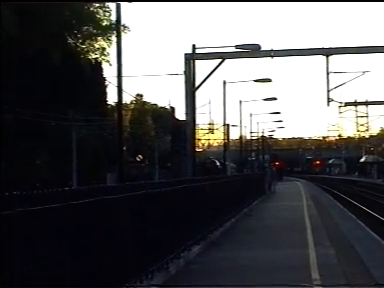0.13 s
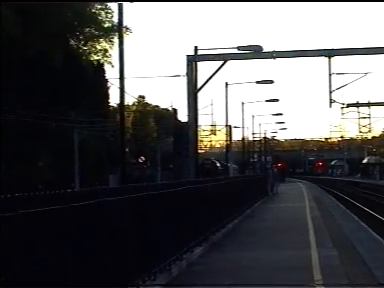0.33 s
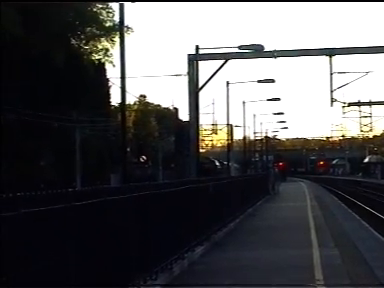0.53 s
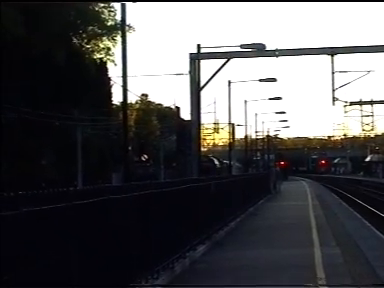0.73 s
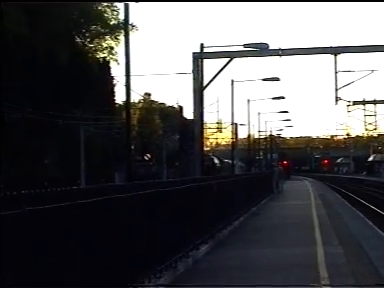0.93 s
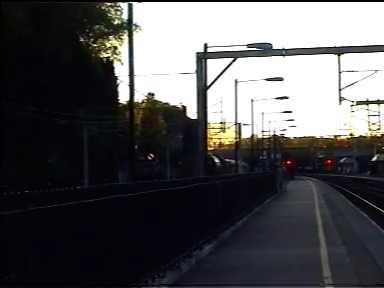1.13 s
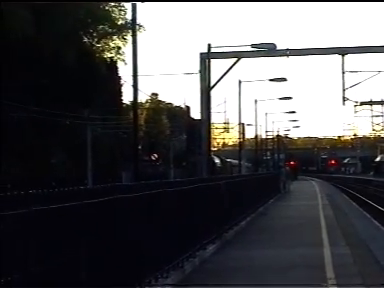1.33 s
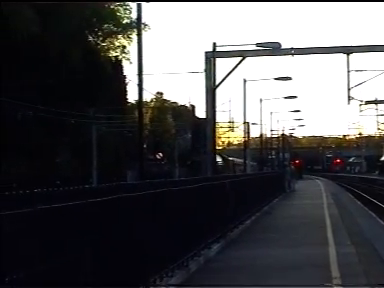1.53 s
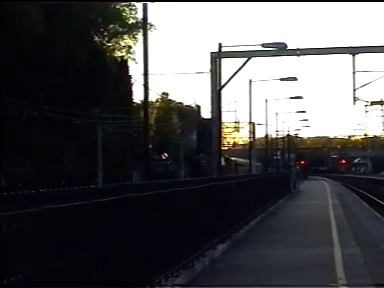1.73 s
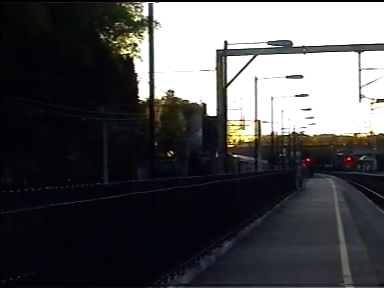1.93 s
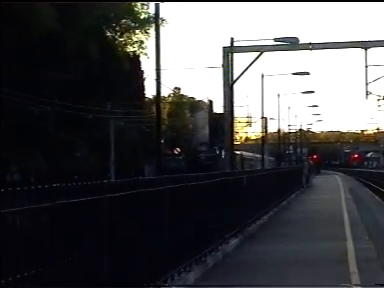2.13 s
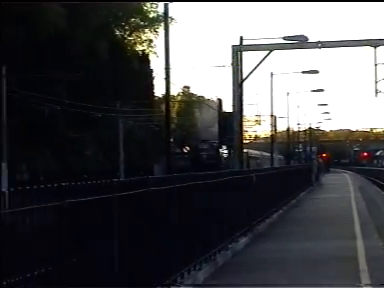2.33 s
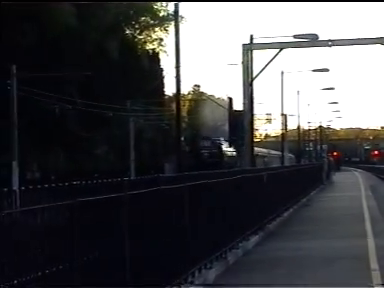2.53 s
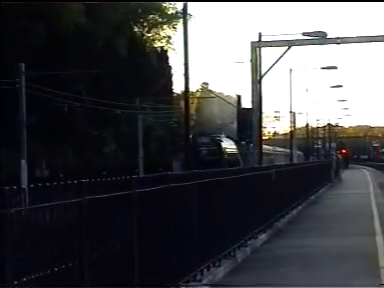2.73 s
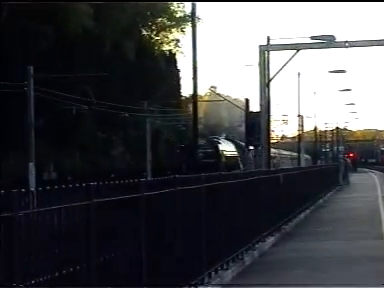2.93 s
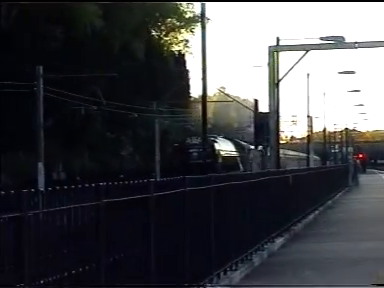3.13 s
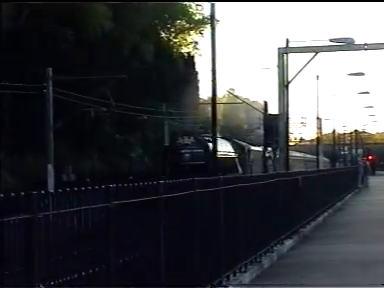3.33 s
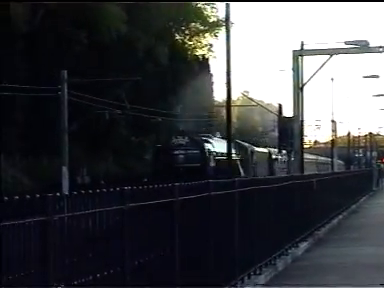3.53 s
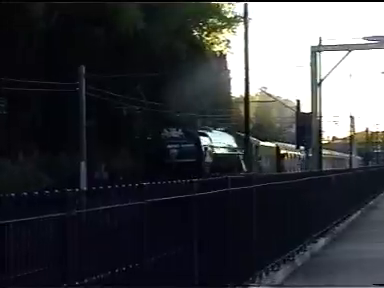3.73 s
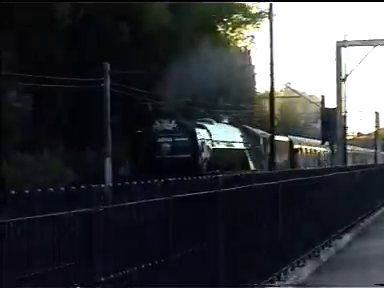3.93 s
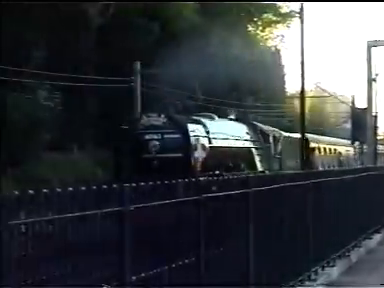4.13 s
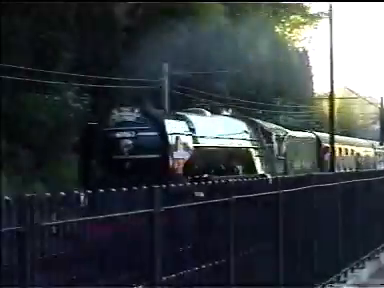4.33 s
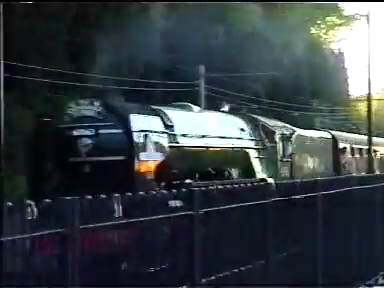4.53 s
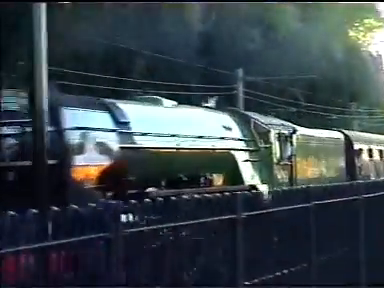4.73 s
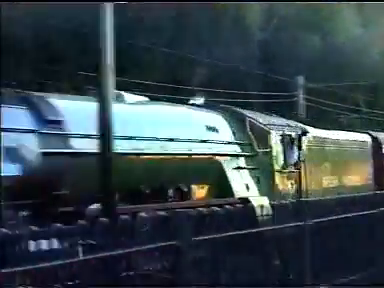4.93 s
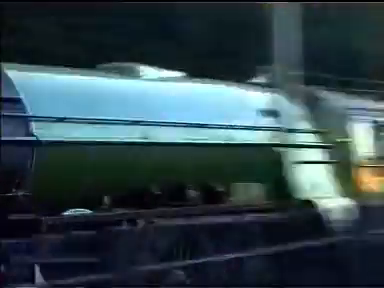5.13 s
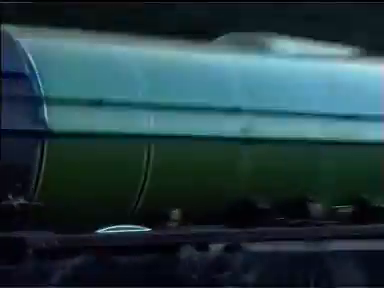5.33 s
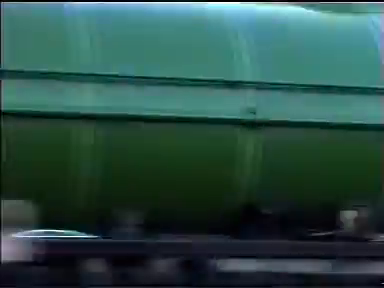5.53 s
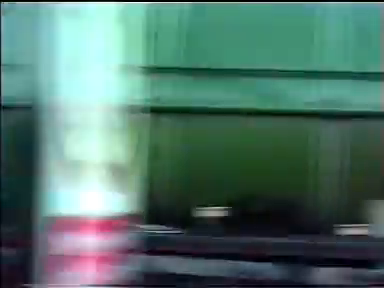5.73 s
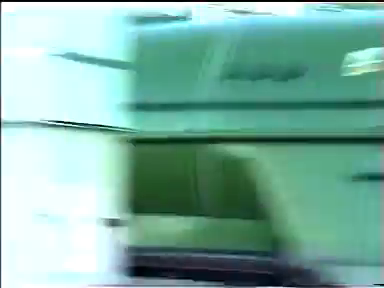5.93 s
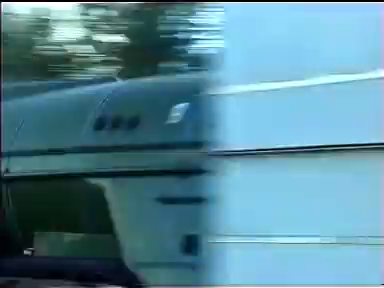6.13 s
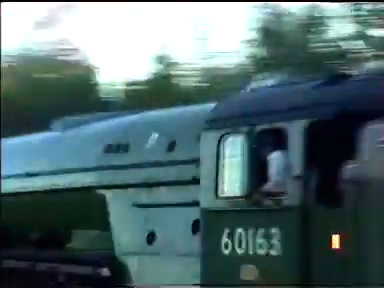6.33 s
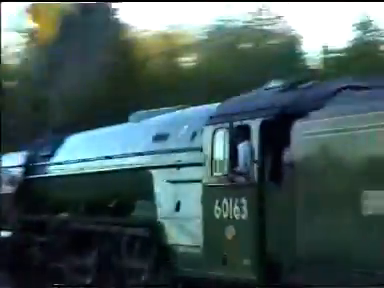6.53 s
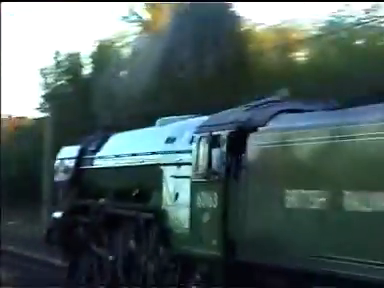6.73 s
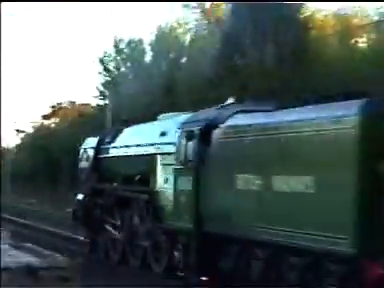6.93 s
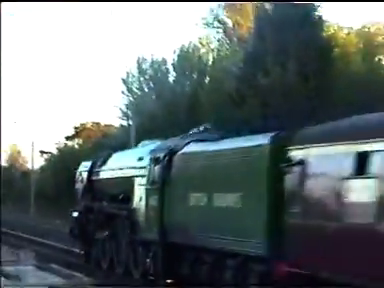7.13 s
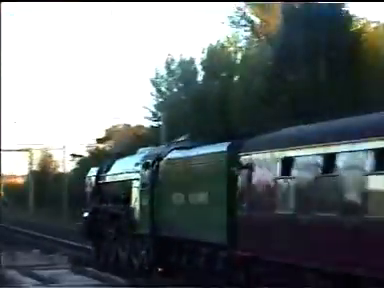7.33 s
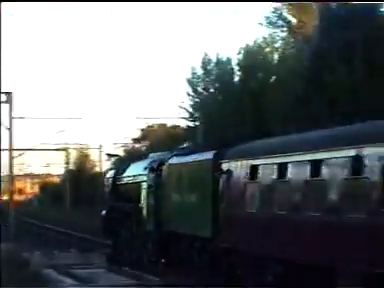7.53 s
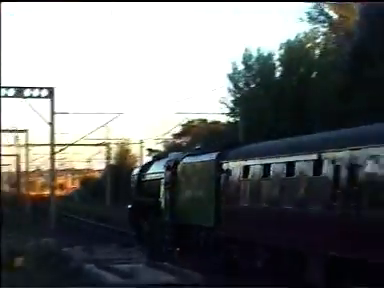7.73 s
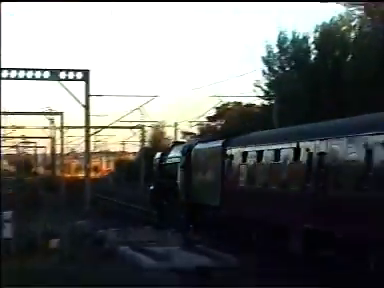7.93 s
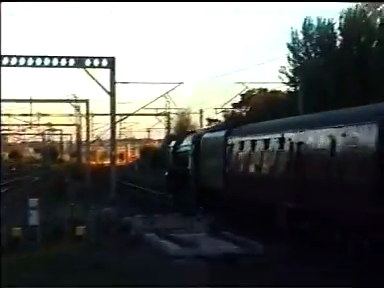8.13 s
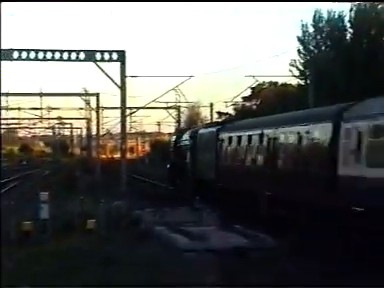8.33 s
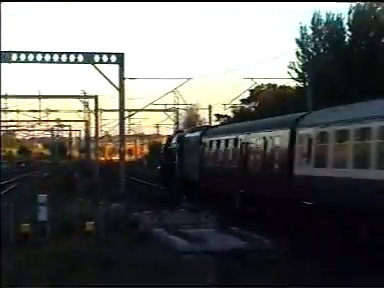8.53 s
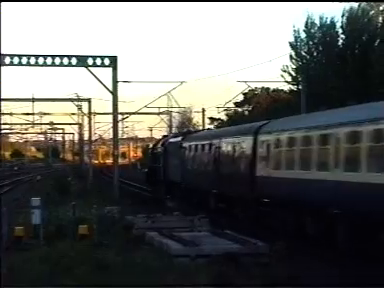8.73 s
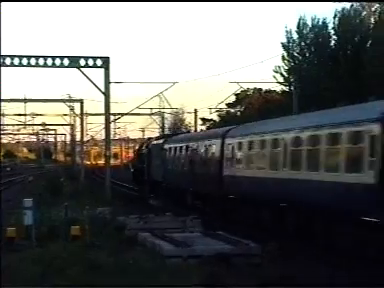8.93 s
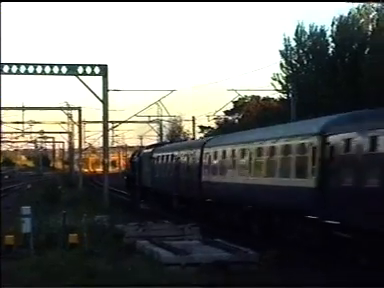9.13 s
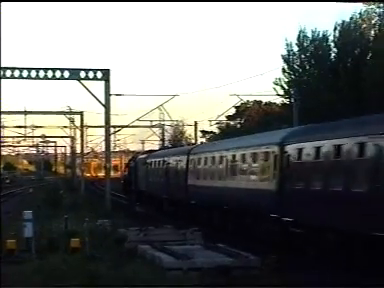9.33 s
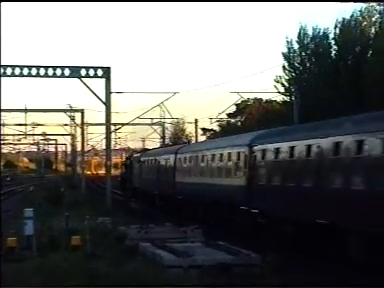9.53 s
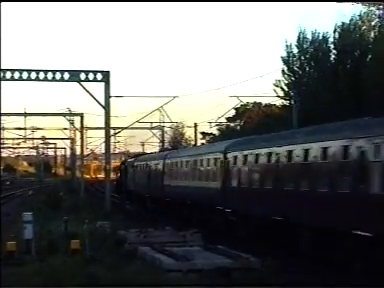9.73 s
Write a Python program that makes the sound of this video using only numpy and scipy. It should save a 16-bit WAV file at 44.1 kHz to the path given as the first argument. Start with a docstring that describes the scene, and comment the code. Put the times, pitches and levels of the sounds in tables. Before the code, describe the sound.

Outdoors on a station platform, rails ring and a distant wheel roar builds. A fast steam locomotive approaches with bright hiss and exhaust beats blurred into a rapid flutter, then sweeps close by with thuds and rattling steel. Its hiss dulls and its beat slows as it recedes, while coaches keep roaring and knocking, leaning left. The stereo microphone is slightly buffeted by air, and the loudest surges are held down.

```python
"""Station platform: a steam express runs through at speed, heard by a microphone with two ports.
The rails (banded noise) ring ahead of it; exhaust beats blur into a fast flutter, slowed by Doppler shift
as the engine goes by. Steam is noise that hisses and dulls with distance.
Then the coach wheels roar (resonant noise, wavering tones) and knock (short noise bursts), mostly on the left."""
import sys
import numpy as np
from scipy import signal
from scipy.fft import rfft, irfft, next_fast_len
from scipy.io import wavfile
from scipy.ndimage import uniform_filter1d, map_coordinates

SR = 44100
rng = np.random.default_rng(int(sys.argv[2]) if len(sys.argv) > 2 else 0)


def unload_wav(signal):
    """Save mono or channel-first audio to the path in sys.argv[1] as 16-bit WAV at rate SR, clipped to [-1, 1]."""
    wavfile.write(
        sys.argv[1],
        SR,
        np.round(np.clip(np.atleast_2d(signal).T, -1, 1) * 32767).astype(np.int16),
    )


N = 431738
T = np.arange(N) / SR  # s
SIZE = next_fast_len(N, True)
HZ = np.arange(SIZE // 2 + 1) * SR / SIZE

TURN_S, TURN_WIDTH_S = 5.8, 0.61  # train swings from ahead to beside
SPEED_M_S, NEAREST_S, TRACK_M, BEAT_HZ = 23, 5.525, 6, 22.96  # engine run; beat rate at the engine
SOUND_M_S = 343

# Spectrum of clashing steel: pitch_hz, density_db (relative, per Hz)
CLASH_SPECTRUM = [(600, -32), (1300, 16.5), (1900, 16), (2600, 10), (4000, -3.5), (7000, -8), (13000, -42)]


def undb(db):
    """Decibels to amplitude gain."""
    return 10 ** (np.asarray(db) / 20)


def curves(table):
    """Each column after start_s as a curve in time."""
    s, *columns = np.transpose(table)
    return [np.interp(T, s, column) for column in columns]


def colours(table, hz):
    """Each column after pitch_hz, interpolated on a log-frequency axis."""
    points_hz, *columns = np.transpose(table)
    log_hz = np.log(np.maximum(hz, 1))
    return [np.interp(log_hz, np.log(points_hz), column) for column in columns]


def walk(rate_hz):
    """Random levels held for 1 / rate_hz and smoothed twice; unit spread."""
    hold = int(SR / rate_hz)
    steps = np.repeat(rng.standard_normal(N // hold + 1), hold)
    smooth = uniform_filter1d(uniform_filter1d(steps, hold), hold)[:N]
    return smooth / smooth.std()


def hump(s, half_s):
    """Gaussian rise and fall around a moment, down to 1/e at half_s."""
    return np.exp(-((T - s) / half_s) ** 2)


def swing(ahead, beside, at_s, width_s):
    """Smooth tanh transition from one value to another."""
    return ahead + (beside - ahead) * (.5 + .5 * np.tanh((T - at_s) / width_s))


def swell(rise_db_per_s, full_s, leaves_s, fall_db_per_s, drop_db):
    """Gain of a passing source: rises, holds while near, then falls by up to drop_db."""
    coming_db = rise_db_per_s * np.maximum(full_s - T, 0)
    going_db = np.minimum(fall_db_per_s * np.maximum(T - leaves_s, 0), drop_db)
    return undb(-coming_db - going_db)


def strokes(table, length_s):
    """Envelope of short bursts from start_s (the peak moment) and level_db."""
    envelope = np.zeros(N)
    age = np.arange(int(8 * length_s * SR)) / SR / length_s  # in units of length_s
    for s, db in table:
        start = int((s - length_s) * SR)
        envelope[start:start + len(age)] += undb(db) * age * np.exp(1 - age)
    return envelope


def port_response():
    """Shared and unshared sound weights, and complex gains of the left and right port."""
    # Two microphone ports: pitch_hz, coherence (0-1), left_lead_rad, left_minus_right_db
    ports = [(30, 0, -5, -27), (70, 0.3, -2.7, -5), (138, 0.96, -2.5, 3), (278, 0.8, -1.23, 7.5),
             (696, 0.8, -0.86, -0.5), (1510, 0.72, 0.26, 0.4), (3200, 0.63, -0.17, 1),
             (6500, 0.41, -0.7, 1), (12000, 0.47, -1.06, -0.5)]
    coherence, lead_rad, left_db = colours(ports, HZ)
    coherence = np.clip(coherence, 0, 1)
    left = undb(left_db / 2) * np.exp(1j * lead_rad)
    right = undb(-left_db / 2)
    return np.sqrt([1 + coherence, 1 - coherence]), np.array([left, right])


MID_SIDE, PORT_GAIN = port_response()


def unit(x):
    """Scale stereo so that its middle has rms 1."""
    return x / x.mean(axis=0).std()


def spectrum_noise(gain_db):
    """Gaussian noise through a gain curve over HZ, as the two ports pick it up."""
    real, imaginary = rng.standard_normal((2, 2, len(HZ)))
    mid, side = (real + 1j * imaginary) * MID_SIDE
    spectrum = np.array([mid + side, mid - side]) * PORT_GAIN * undb(gain_db)
    return unit(irfft(spectrum, SIZE)[:, :N])


def turbulence(spectrum):
    """Noise coloured by a spectrum table, middle at rms 1."""
    return spectrum_noise(colours(spectrum, HZ)[0])


def at_ports(x):
    """One coherent mono sound as the two ports pick it up."""
    return irfft(rfft(x, SIZE) * PORT_GAIN / abs(PORT_GAIN.mean(axis=0)), SIZE)[:, :N]


def place(x, left_db):
    """Lean stereo to the left with the two channel gains averaging 1."""
    gains = undb(np.array([left_db, -left_db]) / 2)
    return x * gains / gains.mean(axis=0)


def reflections(x, share=0.13, clearest_s=3.7, half_s=3.0):
    """One short platform echo; its lag stretches as the train draws level, so the comb bands sink."""
    # Echo path difference: start_s, lag_s
    echo_lag = [(0, .00155), (3.5, .00158), (4.5, .001635), (5.4, .0017), (7, .001665), (9.8, .00165)]
    late_s = T - curves(echo_lag)[0]
    echo = np.array([np.interp(late_s, T, channel) for channel in x])
    gain = share * hump(clearest_s, half_s)
    return (x + gain * echo) / np.hypot(1, gain)


def passing(ahead_spectrum, beside_spectrum, modes):
    """Broad noise with narrow resonances, crossfaded from ahead to beside at equal power."""
    ahead_gain_db = colours(ahead_spectrum, HZ)[0]
    beside_gain_db = colours(beside_spectrum, HZ)[0]
    for hz, width_hz, ahead_db, beside_db in modes:
        peak = 1 / (1 + (2 * (HZ - hz) / width_hz) ** 2)
        ahead_gain_db = ahead_gain_db + ahead_db * peak
        beside_gain_db = beside_gain_db + beside_db * peak
    turned = swing(0, 0.99, TURN_S, TURN_WIDTH_S)
    ahead = np.sqrt(1 - turned) * spectrum_noise(ahead_gain_db)
    return ahead + np.sqrt(turned) * spectrum_noise(beside_gain_db)


def wander(x, drift=0.012, rate_hz=3):
    """Resonances drift at random by a share of their pitch as one bogie after another takes the lead."""
    slip_s = np.cumsum(drift * walk(rate_hz)) / SR
    return np.array([map_coordinates(channel, [(T + slip_s) * SR], order=1, mode="mirror") for channel in x])


def engine_distance():
    """Metres from the engine, on a straight track, to the microphone."""
    return np.hypot(SPEED_M_S * (T - NEAREST_S), TRACK_M)


def background(rumble_db=-66, hum_db=-69, hum_hz=50):
    """Faint low noise rumble and a mains-hum sine."""
    # Background rumble: pitch_hz, density_db (relative, per Hz)
    ground = [(10, 22), (25, 4), (45, 6), (70, -21), (150, -35), (600, -68)]
    mains = np.sqrt(2) * np.sin(2 * np.pi * hum_hz * T)
    return undb(rumble_db) * turbulence(ground) + undb(hum_db) * mains


def draught(buffet_db=3, buffet_hz=15.0):
    """Low wind noise: engine bow wave and coach-end wakes buffet the microphone."""
    # Air pushed aside by the engine and coach ends: start_s (centre), level_db, half_s
    gusts = [(3.6, -58, 0.43), (4.7, -58, 1.0), (7.253, -70, 0.6), (9.3, -69, 0.75)]
    # Colour of that air on the microphone: pitch_hz, density_db (relative, per Hz)
    air_spectrum = [(20, -36), (50, -15), (85, 0.5), (130, -0.5), (200, -15), (400, -32)]
    push = sum(undb(db) * hump(s, half_s) for s, db, half_s in gusts)
    return push * undb(buffet_db * walk(buffet_hz)) * turbulence(air_spectrum)


def top_band(beats, level_db=-35, loudest_s=4.87, half_s=1.35, flutter=0.4):
    """Top band of noise, 11.8-13.9 kHz, swelling and fading around 4.9 s and fluttering with the beats."""
    # Top band: pitch_hz, density_db (relative, per Hz)
    top_band_spectrum = [(10500, -25), (11800, -1), (12900, 8), (13900, 2)]
    return undb(level_db) * hump(loudest_s, half_s) * (1 + flutter * beats) * turbulence(top_band_spectrum)


def rail_song(far_db=-39.0, fade_s=2.3, fade_width_s=0.36, crest_db=-33, crest_s=3.62, crest_half_s=0.58,
              waver_db=1.3):
    """A narrow noise band carried far along the rails fades, then swells once ahead of the engine."""
    # Band the rails carry furthest: pitch_hz, density_db (relative, per Hz)
    singing = [(900, -42), (1150, -2), (1290, 20), (1410, 21), (1520, -2), (1800, -75)]
    far = swing(undb(far_db), 0, fade_s, fade_width_s)
    crest = undb(crest_db) * hump(crest_s, crest_half_s)
    return (far + crest) * undb(waver_db * walk(13)) * turbulence(singing)


def rails(beats, trim_db=-0.5, coaches_db=-1.1, flutter=0.19, rough_db=0.87):
    """Rails ring in broad noise bands; the lighter coaches ring them less."""
    # Rail ring ahead and beside: pitch_hz, density_db (relative, per Hz)
    ahead_spectrum = [(30, -41), (80, -25), (700, -26), (1060, -6.5), (1200, 3.5), (1340, -3), (1470, -1.5),
                      (1590, -4), (1760, 2.5), (1930, -1), (2150, -5), (2900, -6.5), (3200, -6.5),
                      (3600, -10), (5000, -10), (9000, -100)]
    beside_spectrum = [(700, -26), (1050, 0.5), (1200, 1.5), (1420, -2.5), (1590, -8), (1780, -4),
                       (2000, -2), (2250, -8), (2600, -3.5), (3100, -11.5), (3600, -15), (5000, -16.5),
                       (9000, -69)]
    # Rail resonances: pitch_hz, width_hz, ahead_lift_db, beside_lift_db
    modes = [(1350, 79, 6, -2.5), (1400, 82, 0, 4.5), (1810, 160, -2, 1.5), (2660, 180, 0.5, -3),
             (3135, 200, 1.5, 3)]
    # Ring strength before trims: start_s, level_db
    ring_level = [(0.0, -39), (1.45, -33), (2.45, -30.5), (2.8, -30), (3.65, -25), (4.3, -26),
                  (5.25, -26.5), (6.1, -29), (6.35, -29.5), (6.9, -30.5), (7.35, -32.5), (7.85, -31),
                  (8.2, -32), (8.5, -31.5), (9.0, -31.5), (9.7, -33)]
    ring = passing(ahead_spectrum, beside_spectrum, modes)
    load_db = curves(ring_level)[0] + swing(0, coaches_db, TURN_S, TURN_WIDTH_S)
    return ring * (1 + flutter * beats) * undb(trim_db + load_db + rough_db * walk(32))


def bodies(thump_s=0.019, coach_db=-50, nearest_s=9.81, half_s=0.7):
    """Vehicle bodies thump over heavy axles; one coach drums more as it comes by."""
    # Axle thumps on the track bed: start_s (peak), level_db
    thumps = [(5.2, -49), (5.37, -45), (5.63, -41.5), (6.21, -49), (6.75, -51), (7.14, -52), (7.62, -54),
              (7.94, -50), (8.1, -51), (8.76, -49), (9.05, -60)]
    # Low drumming of a vehicle body: pitch_hz, density_db (relative, per Hz)
    body_spectrum = [(100, -26), (185, 4), (235, 0), (330, 9), (600, -38)]
    drumming = undb(coach_db) * hump(nearest_s, half_s)
    return (strokes(thumps, thump_s) + drumming) * turbulence(body_spectrum)


def exhaust_beats(decay_beats=0.34, opening_beats=0.3, scatter_db=4.5, limp_db=2.5,
                  depth_ahead=0.22, depth_behind=0.37, blur_m=85):
    """Doppler-shifted puff modulation about zero, strong and weak in turn; clearest just behind the engine."""
    distance_m = engine_distance()
    cycles = BEAT_HZ * (T - (distance_m - distance_m[0]) / SOUND_M_S) + .06
    beat, phase = cycles.astype(int), cycles % 1
    scatter = scatter_db * rng.standard_normal(beat.max() + 1)[beat]
    size = undb(scatter + limp_db * np.cos(np.pi * beat))
    opening = np.sin(np.pi / 2 * np.minimum(phase / opening_beats, 1))
    puff = size * opening * np.exp(-phase / decay_beats)
    behind = depth_behind / np.hypot(1, distance_m / blur_m)
    depth = swing(depth_ahead, behind, NEAREST_S, TURN_WIDTH_S)
    return (puff / puff.mean() - 1) * np.clip(depth, 0, 1)


def chimney(beats, level_db=-40.0, flutter=0.84):
    """Each exhaust beat is a puff of low noise from the chimney."""
    # Exhaust puffs: pitch_hz, density_db (relative, per Hz)
    puff_spectrum = [(30, -38), (70, -23), (115, -22), (150, -10), (200, -4.5), (250, 1.5), (330, -2),
                     (430, -1), (510, 1), (700, -25), (2000, -54)]
    gain = swell(rise_db_per_s=2.5, full_s=3.9, leaves_s=3.84, fall_db_per_s=4.5, drop_db=17)
    return undb(level_db) * gain * turbulence(puff_spectrum) * (1 + flutter * beats)


def treble_loss(near_db=-1.5, far_ahead_db=23.5, far_behind_db=13, reach_ahead_m=66, reach_behind_m=47):
    """Air loss of high hiss in dB: grows with engine distance and levels off far away."""
    far_db = swing(far_ahead_db, far_behind_db, NEAREST_S, TURN_WIDTH_S)
    reach_m = swing(reach_ahead_m, reach_behind_m, NEAREST_S, TURN_WIDTH_S)
    return far_db + (near_db - far_db) * np.exp(-(engine_distance() / reach_m) ** 2)


def steam(beats, trim_db=-1.0, flutter=0.41, gust_db=1.2, loss_hz=11100.0, loss_power=1.28):
    """Noise jets hiss with the beats, torn by the slipstream; air dulls them with distance."""
    # Steam jets: pitch_hz, density_db (relative, per Hz)
    jet_spectrum = [(30, -27), (80, -16), (500, -11), (1500, 2.5), (2500, 1.5), (3700, 3), (4700, -1),
                    (5300, 3.5), (5900, 2.5), (6600, 4), (7200, 3), (8500, 1.5), (10500, -1), (12300, 0),
                    (13500, -24)]
    # Hiss strength before trim: start_s, level_db
    hiss_level = [(0.0, -44), (1.32, -42), (2.35, -37.5), (2.7, -33), (3.35, -30), (3.95, -28),
                  (4.67, -30.5), (4.79, -33), (4.93, -30.5), (5.4, -29.5), (5.54, -33.5), (5.67, -30),
                  (5.81, -36.5), (5.92, -37), (5.98, -34), (6.35, -37.5), (6.59, -35.5), (7.4, -43.5),
                  (8.05, -44), (8.21, -49.5), (8.35, -45), (8.67, -48), (9.24, -45.5), (9.7, -48.5)]
    hz, s, frames = signal.stft(turbulence(jet_spectrum), SR, nperseg=512)
    # treble_loss() applies in full at loss_hz
    loss = undb(-np.outer((hz / loss_hz) ** loss_power, np.interp(s, T, treble_loss())))
    # Dulling changes the colour; power above 4.5 kHz stays constant
    hiss_band = hz > 4500
    power = np.mean(abs(frames.mean(axis=0)) ** 2, axis=1)[:, None]
    loss /= np.sqrt((power * loss ** 2)[hiss_band].sum(axis=0) / power.sum())
    hiss = signal.istft(frames * loss, SR)[1][:, :N]
    torn_db = gust_db * walk(20) / np.hypot(1, (T - TURN_S) / 2)
    return hiss * (1 + flutter * beats) * undb(trim_db + curves(hiss_level)[0] + torn_db)


def spurts(trim_db=-4.5, half_s=0.013):
    """Single steam puffs swell and fade when the cylinders are close."""
    # Spurts from the passing engine, before trim: start_s (peak), level_db
    puffs = [(4.52, -28), (4.655, -24), (4.92, -29), (4.99, -29), (5.07, -30), (5.14, -29), (5.19, -27),
             (5.325, -23), (5.98, -26.5), (6.04, -34), (6.12, -28), (6.213, -33), (6.303, -32), (6.46, -30),
             (6.585, -37), (6.685, -30), (6.812, -29), (6.877, -36), (7.053, -34), (7.188, -33),
             (7.278, -33), (7.515, -36), (7.56, -35), (7.898, -37)]
    # Spurt colour: pitch_hz, density_db (relative, per Hz)
    puff_spectrum = [(1200, -12), (2500, 3), (4500, 3.5), (7000, -0.5), (10000, -12), (13500, -23)]
    envelope = sum(undb(db) * hump(s, half_s) for s, db in puffs)
    return undb(trim_db) * envelope * turbulence(puff_spectrum)


def running_gear(beats, level_db=-36, loudest_s=5.89, half_s=0.49, flutter=1.0, rough_db=2.5):
    """Force of rods and valve gear, uneven and in time with the beats, as the engine side comes by."""
    return (1 + flutter * beats) * undb(level_db + rough_db * walk(70)) * hump(loudest_s, half_s)


def clatter(count=150, starts_s=5.2, level_db=-36, spread_db=3, rise_s=0.0018, decay_s=0.0067):
    """Force of couplings and bogies striking at uneven intervals, short and dry, once alongside."""
    strikes = np.zeros(N)
    age_s = T[:int(.15 * SR)]
    for k, (when, strength) in enumerate(rng.random((count, 2))):
        s = starts_s + (k + when) / count * (T[-1] - starts_s)
        strikes[int(s * SR)] += undb(level_db + spread_db * (strength - .5))
    blow = (1 - np.exp(-age_s / rise_s)) * np.exp(-age_s / decay_s)
    return signal.fftconvolve(strikes, blow)[:N]


def rattles(beats):
    """Running gear and couplings shake loose steel: both forces drive clash noise."""
    return (running_gear(beats) + clatter()) * turbulence(CLASH_SPECTRUM)


def knocks(trim_db=-5.5, rise_s=0.0044, thud_decay_s=0.025, clash_decay_s=0.034):
    """Each blow sets off a dull noise thud and a steely clash that rings a little longer."""
    # Wheel and running-gear knocks, before trim: start_s, thud_db, clash_db
    blows = [(2.305, -18.5, -47), (5.483, -13, -42), (6.209, -11.5, -36), (6.505, -34, -31),
             (6.672, -40, -21), (6.925, -27, -25), (7.125, -27, -30), (7.2, -14, -44), (7.512, -37, -26),
             (7.865, -38, -30), (8.314, -38, -22.5), (8.345, -20, -25.5), (8.47, -34, -25),
             (8.515, -30, -36), (8.635, -15, -24), (8.825, -35, -31), (8.94, -21, -45), (9.04, -23, -43),
             (9.31, -24, -27), (9.37, -20, -29), (9.662, -38, -30), (9.74, -36, -26)]
    # Thud colour: pitch_hz, density_db (relative, per Hz)
    thud_spectrum = [(150, -44), (400, -10), (560, -7), (800, 14), (1100, -10), (2500, -51)]
    thud, clash = np.zeros((2, N))
    for s, thud_db, clash_db in blows:
        span = slice(int(s * SR), int((s + .5) * SR))
        age_s = T[span] - T[span][0]
        onset = 1 - np.exp(-age_s / rise_s)
        thud[span] += undb(thud_db) * onset * np.exp(-age_s / thud_decay_s)
        clash[span] += undb(clash_db) * onset * np.exp(-age_s / clash_decay_s)
    return undb(trim_db) * (thud * turbulence(thud_spectrum) + clash * turbulence(CLASH_SPECTRUM))


def coach_ring(level_db=-37, nearest_s=9.6, half_s=0.62, rough_db=0.5):
    """Wheels of one coach scrape and ring in narrow noise bands."""
    # Nearest coach's wheels: pitch_hz, density_db (relative, per Hz)
    ring_spectrum = [(1000, -42), (1250, -6), (1420, 13), (1560, -23), (2050, 1), (2450, -2), (2750, -3),
                     (2980, -3), (3200, -6), (4500, -50)]
    return undb(level_db + rough_db * walk(60)) * hump(nearest_s, half_s) * turbulence(ring_spectrum)


def rings(waver_hz=16, rough_db=3.0):
    """Rough contact holds one steel mode ringing briefly, a sine unsteady in pitch and strength."""
    # Wheel or rail ringing out: start_s (centre), pitch_hz, level_db, half_s
    moments = [(0.48, 790, -38, .06), (0.806, 1320, -41.5, 0.11), (1.349, 790, -34.5, 0.081),
               (1.431, 1343, -32.5, .05), (2.881, 780, -35, .09), (3.581, 1321, -32.5, .16),
               (3.71, 1805, -32, 0.055), (4.77, 795, -33, .08), (5.492, 567, -29, .06),
               (7.12, 3620, -51, .08), (8.26, 1240, -36, .07), (8.36, 1760, -47, .08),
               (8.623, 1220, -47, .09), (8.87, 2470, -42, .08), (8.979, 708, -34, .07),
               (9.25, 2510, -49, .1), (9.56, 3000, -45, .11), (9.7, 1376, -37, .07)]
    out = np.zeros(N)
    waver, grain = waver_hz * walk(90), undb(rough_db * walk(60))
    for s, hz, db, half_s in moments:
        near = abs(T - s) < 3 * half_s
        tone = np.sqrt(2) * np.sin(2 * np.pi * np.cumsum(hz + waver[near]) / SR)
        out[near] += undb(db) * hump(s, half_s)[near] * grain[near] * tone
    return at_ports(out)


def wheel_note(table, trim_db, shake_hz):
    """A gliding wheel resonance: quadrature carriers shaken by independent random walks."""
    hz, db = curves(table)
    phase = 2 * np.pi * np.cumsum(hz) / SR
    tone = walk(shake_hz) * np.cos(phase) + walk(shake_hz) * np.sin(phase)
    return at_ports(undb(trim_db + db) * tone)


def wheel_notes():
    """The two clearest wheel resonances, rising and sinking as the bogies pass."""
    # Strongest note, before trim: start_s, pitch_hz, level_db
    main_note = [(5.2, 860, -52), (5.55, 845, -33), (6.3, 825.5, -36), (6.85, 858, -35), (7.6, 851, -32),
                 (8.15, 877, -35), (8.6, 833, -39), (9.25, 821, -29.5), (9.75, 862, -35)]
    # Higher, rougher note that sinks late on, before trim: start_s, pitch_hz, level_db
    upper_note = [(2.0, 1786, -47), (2.9, 1820, -35), (3.65, 1822, -36), (4.4, 1830, -39), (5.3, 1855, -32),
                  (5.9, 1890, -50), (6.9, 1948, -38), (7.7, 1807, -38.5), (8.4, 1754, -44),
                  (8.9, 1740, -58)]
    main = wheel_note(main_note, trim_db=-0.5, shake_hz=85)
    return main + wheel_note(upper_note, trim_db=-2.5, shake_hz=260)


def wheels(beats, ahead_db=-26.5, beside_db=-26.0, flutter=0.033, rough_db=0.42):
    """Rough treads make the wheels roar in resonant noise; the engine's beat shakes the roar."""
    # Wheel roar ahead and beside: pitch_hz, density_db (relative, per Hz)
    ahead_spectrum = [(150, -41), (300, -13.5), (410, -9.5), (490, -10), (590, 3), (660, -1.5), (740, 1),
                      (810, 2), (940, 0), (1060, -8), (1500, -28), (4000, -66)]
    beside_spectrum = [(120, -57), (250, -31.5), (350, -16), (440, -5), (540, -2), (630, 3.5), (780, 2),
                       (850, 2.5), (950, 1.5), (1150, -8.5), (1600, -15), (4000, -68)]
    # Wheel and track resonances: pitch_hz, width_hz, ahead_lift_db, beside_lift_db
    modes = [(610, 23, 0.5, -2), (671, 72, 6, 0.3), (790, 48, 2, -0.5)]
    # Surges of the roar: start_s (centre), lift_db, half_s
    surges = [(0.47, 0, 0.05), (1.28, 0, 0.09), (1.604, 0.3, 0.11), (2.89, 2, 0.055), (3.576, 1.3, 0.081),
              (4.753, 1.5, 0.059), (5.52, 0, 0.08)]
    roar = wander(passing(ahead_spectrum, beside_spectrum, modes))
    gain = swell(rise_db_per_s=3.0, full_s=3.68, leaves_s=8.0, fall_db_per_s=6, drop_db=0.4)
    level_db = swing(ahead_db, beside_db, TURN_S, TURN_WIDTH_S)
    surge_db = sum(db * hump(s, half_s) for s, db, half_s in surges)
    return gain * roar * (1 + flutter * beats) * undb(level_db + surge_db + rough_db * walk(27))


def scene():
    """Background, draught and all train parts; the lean grows as it passes, least for the high noise."""
    left_db = swing(3, 9, at_s=6.3, width_s=0.75)
    beats = exhaust_beats()
    steel = knocks() + rattles(beats) + rails(beats)
    rolling = wheels(beats) + reflections(steel) + rail_song() + coach_ring() + wheel_notes() + rings()
    rumble = chimney(beats) + bodies()
    high_noise = reflections(steam(beats) + spurts()) + top_band(beats)
    placed = place(rolling, left_db) + place(rumble, 0.33 * left_db) + place(high_noise, 0.11 * left_db)
    return placed + draught() + background()


def record(dry, limit_db=-19.5, squeeze=0.95, response_s=0.0019, top_hz=13900):
    """Gain control holds down the loudest surges; an elliptic low-pass cuts the top."""
    keep = np.exp(-1 / (response_s * SR))
    power = np.mean(dry ** 2, axis=0)
    loudness = np.sqrt(signal.lfilter([1 - keep], [1, -keep], power))
    gain = np.maximum(loudness / undb(limit_db), 1) ** -squeeze
    low_pass = signal.ellip(10, .2, 80, top_hz, fs=SR, output="sos")
    return signal.sosfilt(low_pass, dry * gain)


dry = scene()
out = record(dry)
unload_wav(out)
```